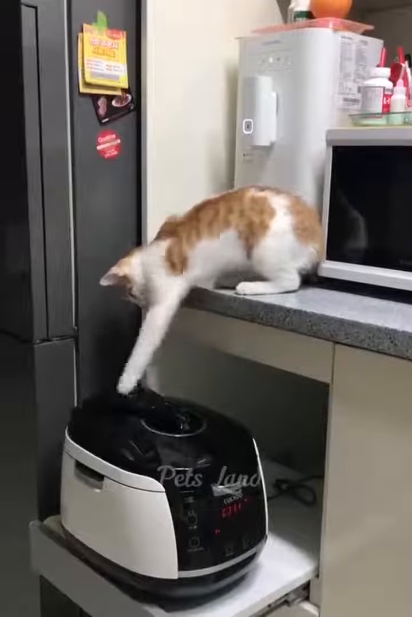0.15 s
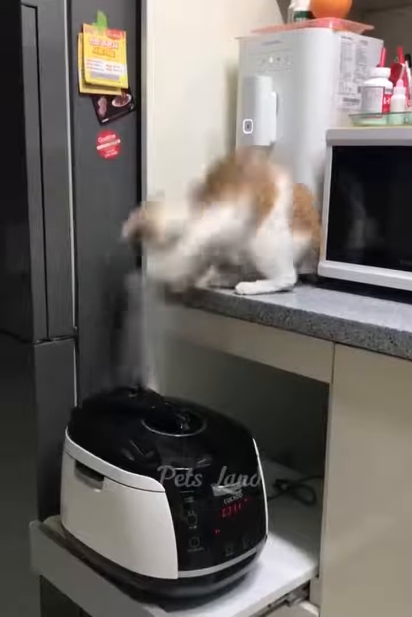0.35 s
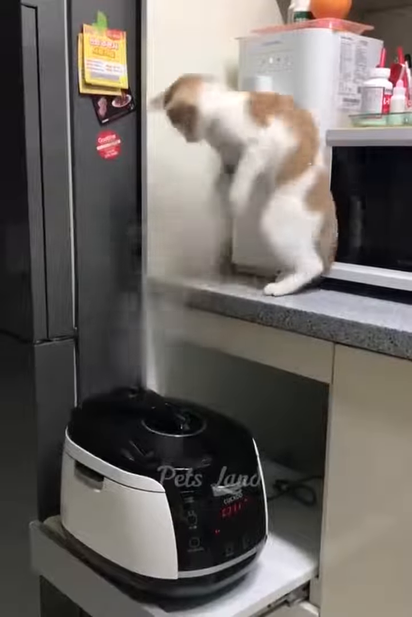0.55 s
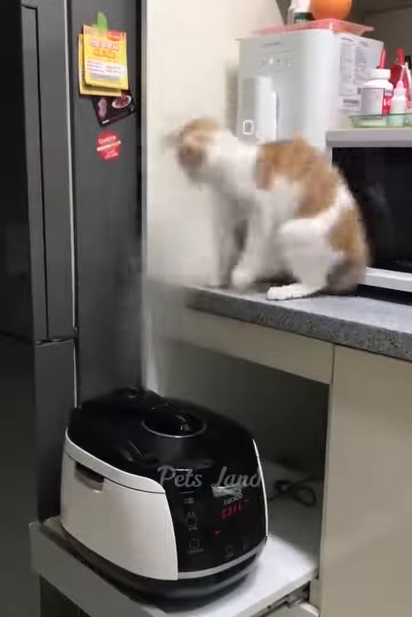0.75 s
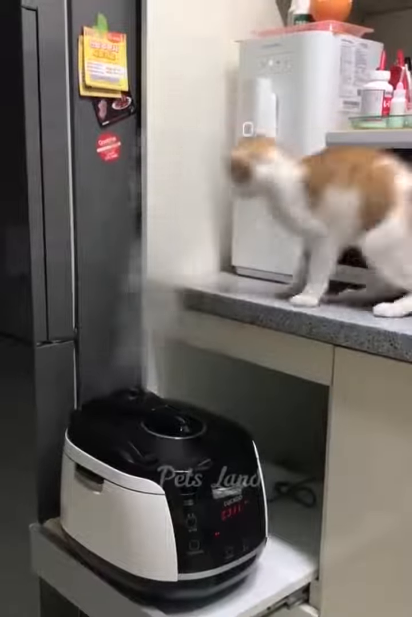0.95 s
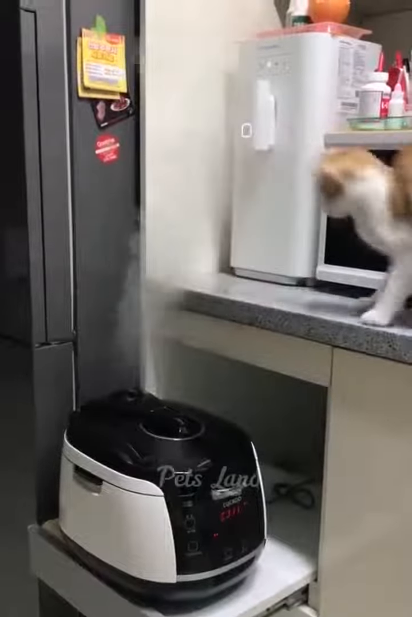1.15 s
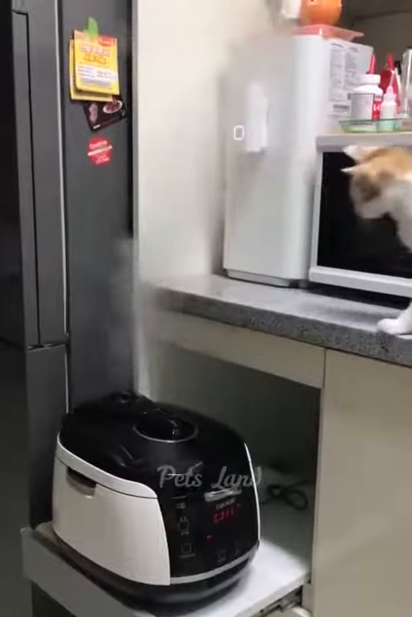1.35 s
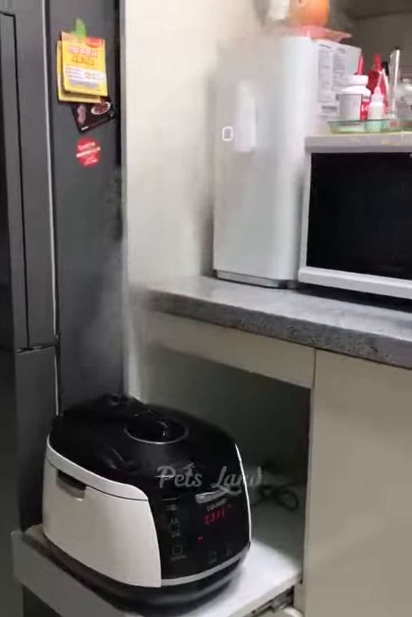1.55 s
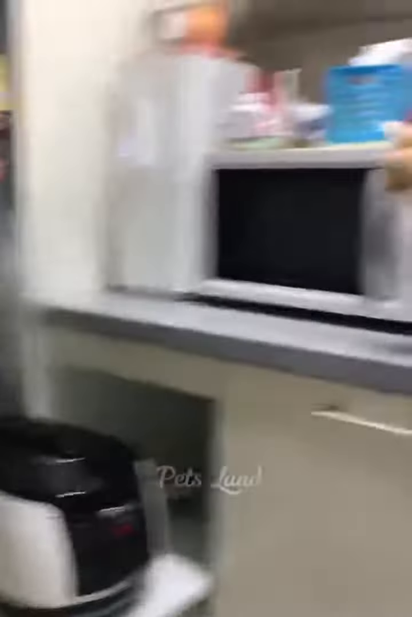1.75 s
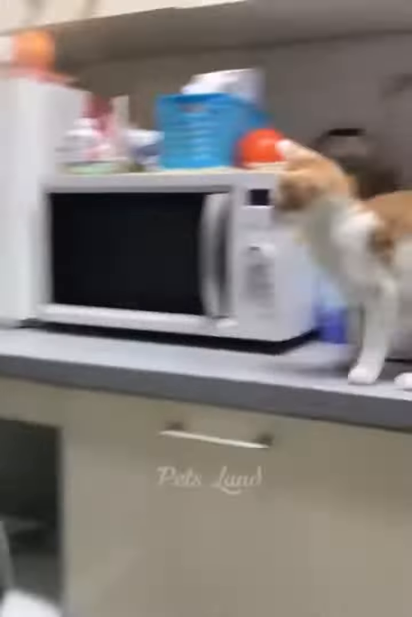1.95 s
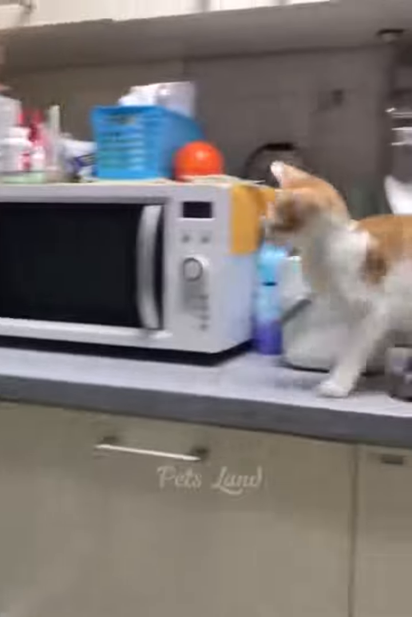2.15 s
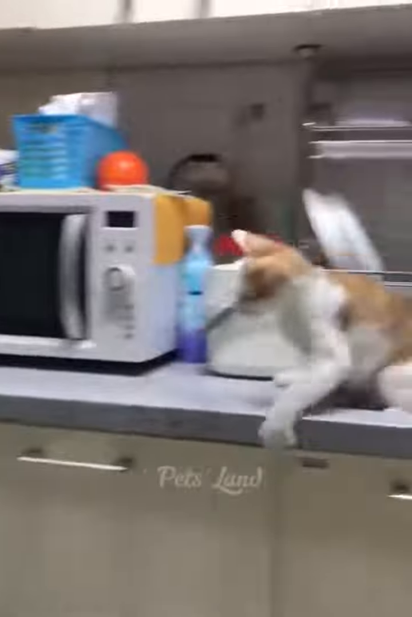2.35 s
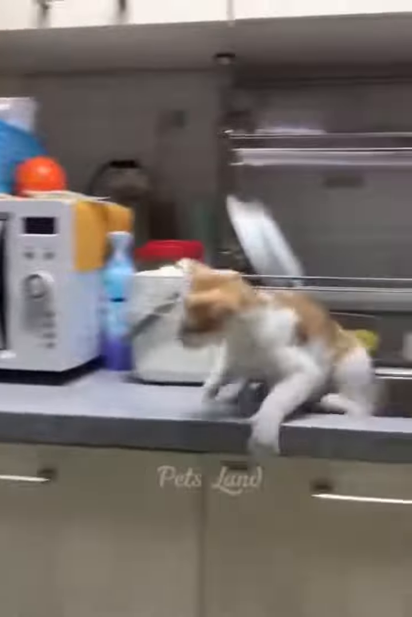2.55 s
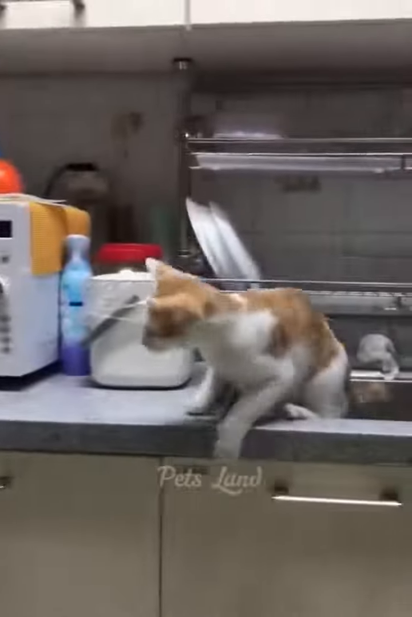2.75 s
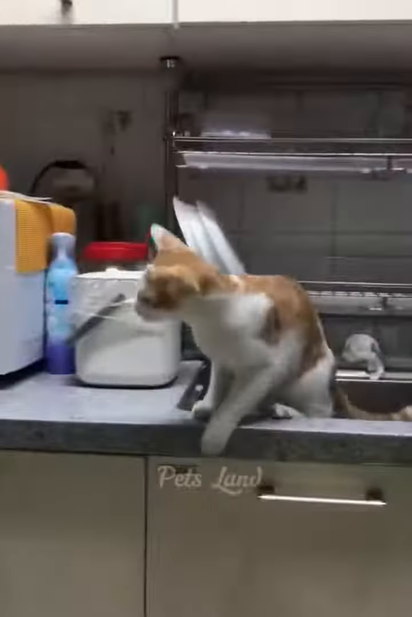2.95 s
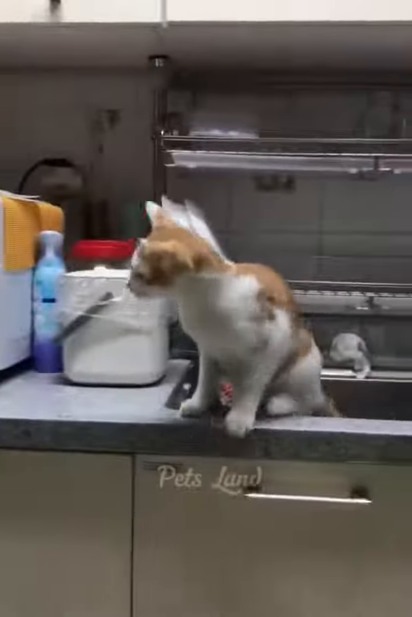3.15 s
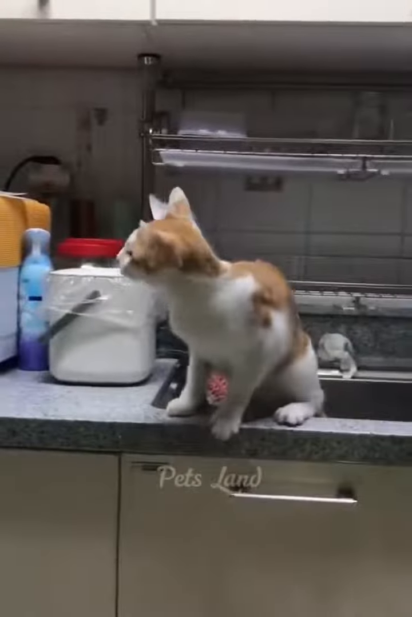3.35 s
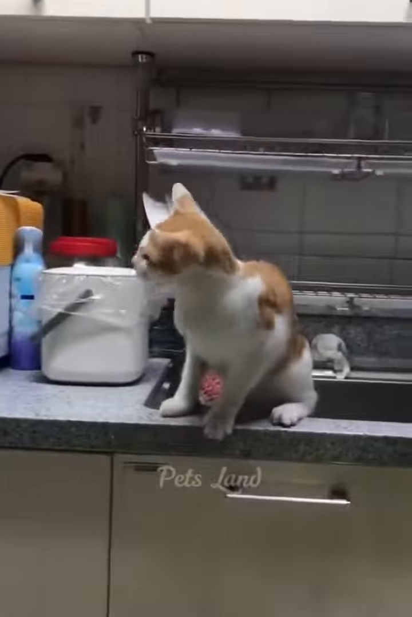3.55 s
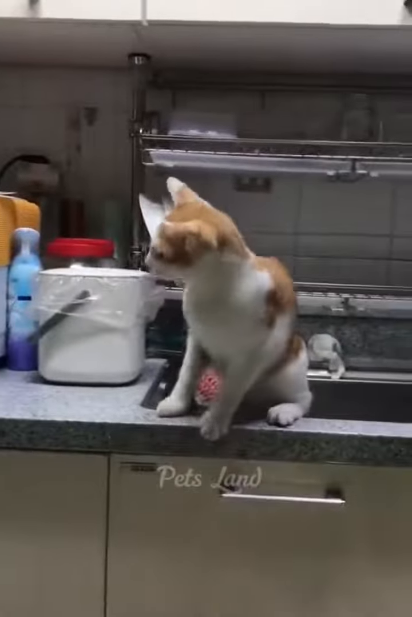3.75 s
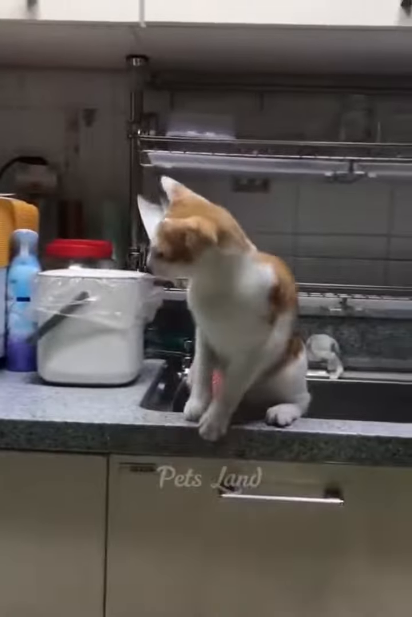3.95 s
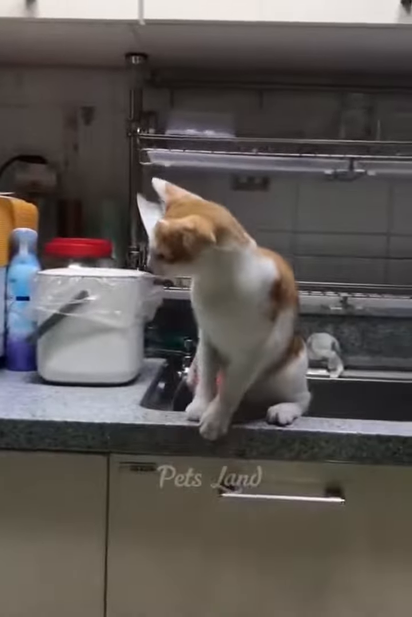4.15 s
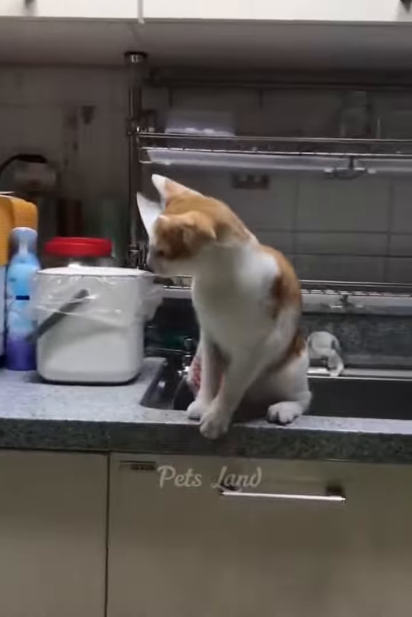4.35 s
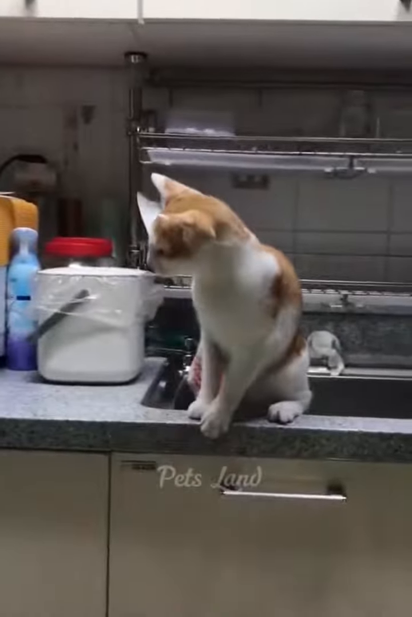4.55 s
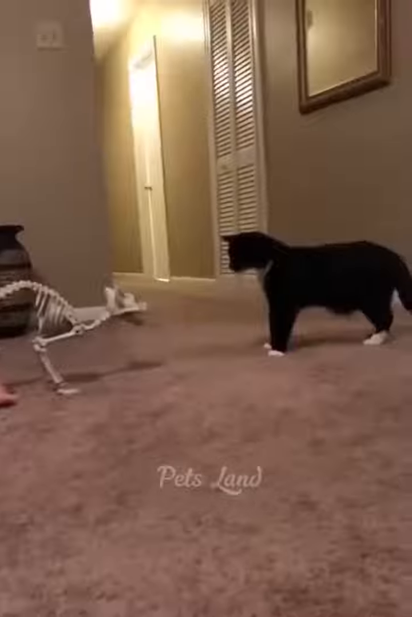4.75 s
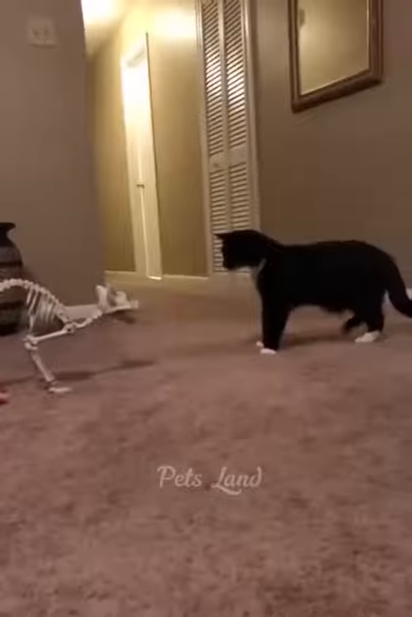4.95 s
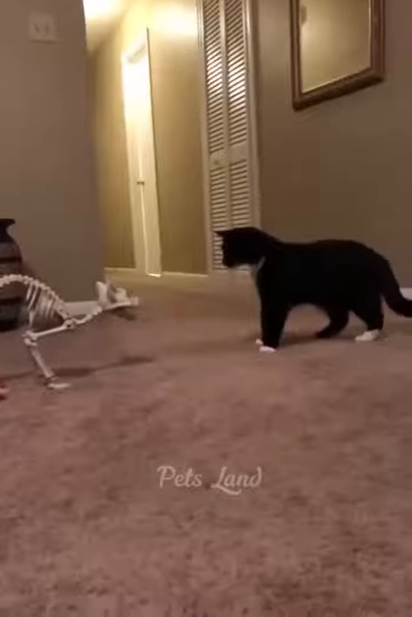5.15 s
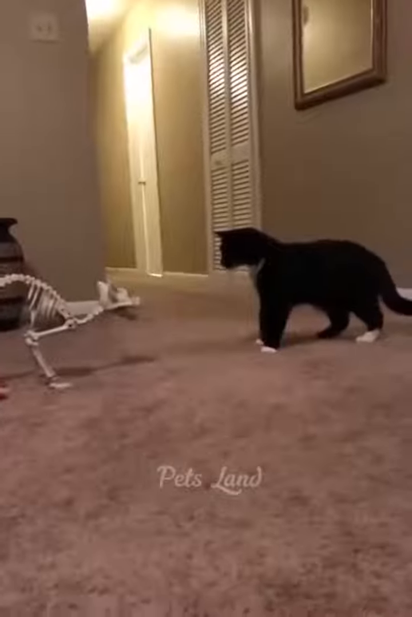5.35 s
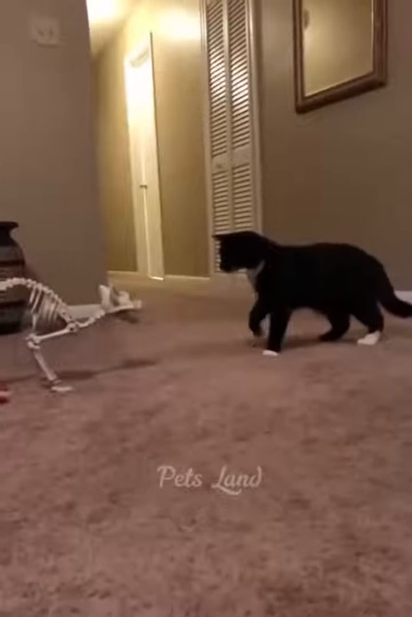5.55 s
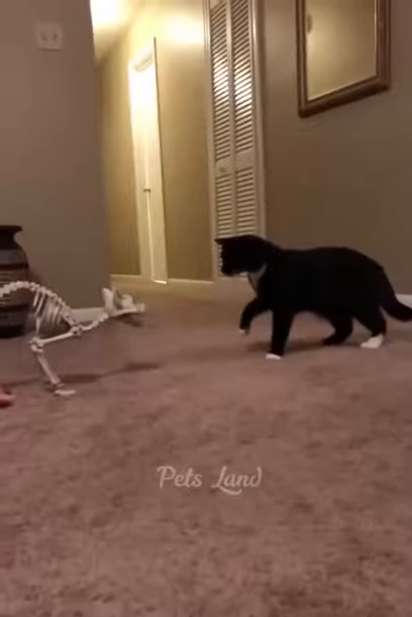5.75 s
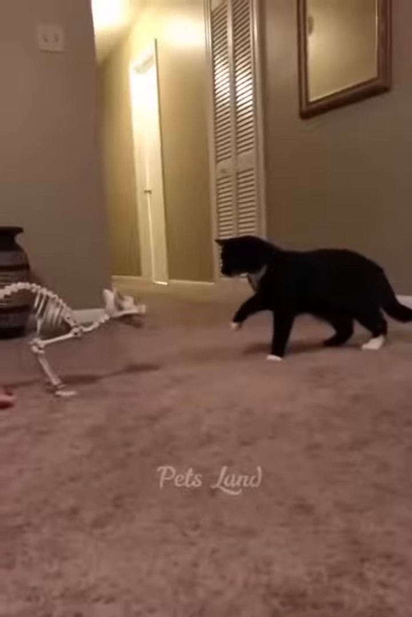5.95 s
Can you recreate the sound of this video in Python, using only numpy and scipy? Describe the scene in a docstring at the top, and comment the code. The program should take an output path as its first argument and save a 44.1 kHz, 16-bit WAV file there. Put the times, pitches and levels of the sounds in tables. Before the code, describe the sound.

The first quarter second is quiet kitchen air with a faint low rumble. At about 0.25 a small airy puff and weak wet spurt escape the cooker valve, and at 0.39 a tiny metallic tick sounds. At 0.41 the valve opens abruptly: a brief, strong watery spurt and roar settle within a few tenths into a loud, bright, dense steam hiss, fluttering finely, with narrow ringing tones and faint hollow echoes. Half-whistles swell subtly near 1.15 and more weakly near 3.4. Soft hollow paw thuds run underneath from 0.7 to 1.5 and again around 2.2 to 3.1, with short scuffs near 1.0, 1.3, 2.5 and 4.0, mostly masked. The hiss sags slightly, then stops dead at 4.75. After roughly 0.07 of silence, a carpeted room begins at 4.82: soft deep ventilation rumble, dull air noise and a low motor hum wavering in pitch and level until the end.

```python
"""In a kitchen, a cat paws the valve of a pressure rice cooker: a short puff, a tick, then a loud steam jet.
The puff, wet spurts and jet are coloured noise; the jet has cap resonances, half-whistles and echoes.
The cat's paws thud on a hollow counter (ringing noise bands) and scuff across it (short noise bursts).
Everything stops dead; after a blink of silence comes a carpeted lounge: low ventilation noise,
and a motor hum made by a sine wave of wavering pitch and level."""
import sys
import numpy as np
from scipy import signal
from scipy.fft import rfft, irfft, next_fast_len
from scipy.io import wavfile

SR = 44100
rng = np.random.default_rng(int(sys.argv[2]) if len(sys.argv) > 2 else 0)


def inscribe(sig):
    """Save sig as 16-bit PCM at rate SR to the path in sys.argv[1].

    A 1-D sig is mono; a 2-D sig holds one channel per row.
    Samples are clipped to [-1, 1] before scaling.
    """
    pcm = np.round(np.clip(np.atleast_2d(sig).T, -1, 1) * 32767)
    wavfile.write(sys.argv[1], SR, pcm.astype(np.int16))


N = 265041  # samples, about 6 s

VALVE_OPEN_S, VALVE_RISE_S = .4145, .016
KITCHEN_END_S, LOUNGE_START_S, LOUNGE_FADE_S = 4.7463, 4.8175, .003


def undb(db):
    """Turn decibels into a gain."""
    return 10 ** (np.asarray(db) / 20)


def clock():
    """Time of each sample in seconds."""
    return np.arange(N) / SR


def unit(x):
    """Scale a sound to rms 1."""
    return x / np.sqrt(np.mean(x ** 2))


def bins():
    """Frequency of each spectral bin in Hz, kept at 1 or more."""
    size = next_fast_len(N)
    return np.maximum(np.arange(size // 2 + 1) * SR / size, 1)


def colour(points):
    """Gain per bin, drawn through (frequency [Hz], level [dB]) points on a log frequency scale."""
    hz, db = np.transpose(points)
    return undb(np.interp(np.log(bins()), np.log(hz), db))


def resonance(hz, width_hz):
    """Gain per bin of one resonance, 1 at its centre."""
    return 1 / np.hypot(1, (bins() ** 2 - hz ** 2) / (bins() * width_hz))


def noise(gain):
    """Random noise shaped by a gain per bin, then scaled to rms 1."""
    size = next_fast_len(N)
    spectrum = rfft(rng.standard_normal(size)) * gain
    return unit(irfft(spectrum, size)[:N])


def walk(rate):
    """Random wander with a spread near 1: straight lines between `rate` random points per second."""
    steps = rng.standard_normal(2048)
    return 1.2 * np.interp(clock() * rate, np.arange(len(steps)), steps)


def burst(start, rise, decay):
    """Envelope that rises in a straight line, then dies away exponentially; times in seconds."""
    age = clock() - start
    return np.clip(age / rise, 0, 1) * np.exp(-np.maximum(age - rise, 0) / decay)


def swell(start, rise):
    """Rounded envelope of a soft blow: peaks at 1, one rise time after its start."""
    age = np.maximum(clock() - start, 0) / rise
    return age * np.exp(1 - age)


def surfaces(x, echo_db, drift_s, count=8):
    """Echoes off fridge, wall and counter, with slowly drifting delays, make the hiss faintly hollow."""
    out = x
    for lag_s in rng.uniform(.003, .022, count):
        path_s = lag_s + drift_s * walk(.8)
        source = np.round((clock() - path_s) * SR).astype(int)
        out = out + undb(echo_db) * x[np.clip(source, 0, N - 1)]
    return unit(out) * np.std(x)  # echoes leave the overall level as it was


# colour of the kitchen air: (frequency [Hz], relative level [dB])
KITCHEN_COLOUR = [(25, -32), (60, -23), (150, 1.5), (240, -5), (350, 3.5), (480, -13), (1000, -9.5),
                  (2000, -19.5), (6000, -21.5), (7200, -37), (15000, -34)]


def kitchen_air(air_db=-49, rumble_db=-56):
    """Steady quiet room noise, with a faint low rumble of wandering level."""
    rumble = noise(resonance(85, 90) ** 2) * undb(rumble_db + 2 * walk(6))
    return undb(air_db) * noise(colour(KITCHEN_COLOUR)) + rumble


# wet spurts from the valve: (time [s], level [dB], rise [s], decay [s])
SPURTS = [(0.269, -36, 0.0037, 0.07), (.427, -13.5, 0.02, 0.012), (0.459, -26, 0.012, 0.1)]
# colour of the spurting water: (frequency [Hz], relative level [dB])
SPURT_COLOUR = [(35, -31), (120, -14), (450, -8), (750, -7.5), (1150, -2.5), (1700, -10), (3000, -22),
                (7000, -35), (15000, -46.5)]


def valve():
    """A nudge lets out one puff; the weight ticks, tips over, and condensed water is blown out."""
    puff_colour = [(500, -42), (1800, -4), (3400, -3.0), (6000, -7), (7200, -26), (15000, -24)]
    puff = undb(-35) * noise(colour(puff_colour)) * burst(0.253, 0.02, 0.034)

    low_mode = resonance(2800, 700) ** 2
    middle_mode = undb(-10) * resonance(3300, 600) ** 2
    high_mode = undb(-10) * resonance(7200, 900)
    metal = noise(low_mode + middle_mode + high_mode)
    # a sharp click with a weaker, longer tail
    strike = burst(.387, .001, .0025) + undb(-13) * burst(.388, .002, .018)
    tick = undb(-32.5) * metal * strike

    spurts = sum(undb(db) * burst(s, rise, decay) for s, db, rise, decay in SPURTS)
    return puff + tick + noise(colour(SPURT_COLOUR)) * spurts


# broad colour of the steam: (frequency [Hz], relative level [dB])
STEAM_COLOUR = [(150, -27), (600, -25.5), (1150, -22), (1900, -10), (2650, -1.5), (3500, -2), (4450, -8.5),
                (4750, -4.5), (5200, -5.5), (6350, 2.5), (8000, -5.5), (10300, -7), (13500, -8),
                (15600, -4.5)]
# resonances of the vent cap and the nook round it: (frequency [Hz], width [Hz], relative level [dB])
VENT_RESONANCES = [(625, 35, 3), (1125, 30, 3), (1375, 25, 3), (1891, 27, 1), (2534, 22, 1), (2891, 18, 2),
                   (3079, 25, -4), (3158, 25, 5), (3296, 22, -1), (3348, 16, 1), (3440, 16, -4),
                   (3531, 18, 1), (3611, 22, 2.5), (3781, 22, -2), (4012, 16, 0), (6886, 22, 1),
                   (7884, 35, -2), (8670, 27, -1)]
# dips where paths round the cap cancel, and one slight bump: (frequency [Hz], width [Hz], change [dB])
STEAM_GAPS = [(2422, 210, -8.5), (4540, 350, 1), (6746, 380, -11.5), (10300, 700, -4)]
JET_DB = -17  # gain of the whole jet
SAG_DB_PER_S, CAP_SAG_DB_PER_S = .3345, .48  # hiss and cap sag with the pressure; the cap's extra sag
TOP_DB, ROAR_DB, CAP_DB = -2.5, -13, -5  # levels beside the hiss, before sag and surge
SURGE_ROAR_DB, SURGE_S = 9.5, .1  # extra roar at first, and its settling time


def steam_jet(flutter_db=0.58, sputter_db=0.58, ring_flutter_db=0.66, roar_edge_hz=2300,
              top_edge_hz=9500):
    """Jet noise rings the cap; both sag with pressure, the roar surges at first, and all flutter together."""
    age = np.maximum(clock() - VALVE_OPEN_S, 0)
    surge = np.exp(-age / SURGE_S)
    sag_db = -SAG_DB_PER_S * age
    gaps_db = sum(db * resonance(hz, width) ** 2 for hz, width, db in STEAM_GAPS)
    shape = colour(STEAM_COLOUR) * undb(gaps_db)

    # split the noise power into a low, a middle and a high band
    roar_share = 1 / (1 + (bins() / roar_edge_hz) ** 16)
    top_share = 1 / (1 + (top_edge_hz / bins()) ** 24)
    hiss_share = np.clip(1 - roar_share - top_share, 0, 1)
    ring = np.sqrt(sum((undb(db) * resonance(hz, width)) ** 2 for hz, width, db in VENT_RESONANCES))

    hiss = noise(shape * np.sqrt(hiss_share)) * undb(sag_db)
    cap_db = CAP_DB + sag_db - CAP_SAG_DB_PER_S * age + ring_flutter_db * walk(12)
    cap = noise(shape * ring) * undb(cap_db)
    roar = noise(shape * np.sqrt(roar_share)) * undb(ROAR_DB + SURGE_ROAR_DB * surge)
    top = noise(shape * np.sqrt(top_share)) * undb(TOP_DB)

    jet = surfaces(hiss + cap + top, echo_db=-15.5, drift_s=.00004)
    jet = jet + surfaces(roar, echo_db=-11.0, drift_s=.00006)
    opening = np.clip(age / VALVE_RISE_S, 0, 1)
    return jet * opening * undb(JET_DB + flutter_db * walk(28.06) + sputter_db * walk(220))


# half-whistled notes of the vent: (time of peak [s], pitch [Hz], peak level [dB])
WHISTLES = [(1.15, 2891, -27.5), (3.4, 3165, -33)]


def whistle(width_hz=45, fade_db_per_s=4.0):
    """The vent half whistles: narrow noise bands rise out of the hiss and sink back into it."""
    notes = 0
    for s, hz, db in WHISTLES:
        level_db = db - fade_db_per_s * np.abs(clock() - s)
        notes = notes + noise(resonance(hz, width_hz) ** 2) * undb(level_db)
    return notes * (clock() > VALVE_OPEN_S + VALVE_RISE_S)


# resonances of the hollow counter: (frequency [Hz], width before squaring [Hz], level before tilt [dB])
COUNTER = [(74, 21, -1.5), (122, 75, 0.5), (226, 160, -1)]
# paws landing; a harder landing tilts the thud upwards: (time [s], level [dB], tilt [dB per octave])
PAWS = [(.678, -32, 1), (.735, -37.5, 14), (.785, -32, 2.5), (.93, -39, 3), (1.03, -37, -6),
        (1.135, -33.5, -3.5), (1.21, -35.5, -7.5), (1.305, -28.5, -1.5), (1.42, -34, -5), (1.495, -33, -14),
        (2.228, -41, 15), (2.42, -37.5, 10), (2.478, -30.5, 13), (2.57, -37, 2), (2.615, -38, -11),
        (3.08, -43, 12)]
# paws scuffing and slipping: (time [s], level [dB])
SCUFFS = [(1.0, -28.5), (1.31, -34), (2.475, -28), (2.56, -35), (3.97, -30)]
# colour of the scuffs: (frequency [Hz], relative level [dB])
SCUFF_COLOUR = [(80, -17), (220, -10), (450, -10.5), (1100, -1.5), (2000, -1.5), (6000, -40)]
PAW_RISE_S, SCUFF_RISE_S, SCUFF_DECAY_S = .024, .0091, .056


def cat():
    """Soft paws thud on the hollow counter and scuff across its top."""
    hz, width, mode_db = np.transpose(COUNTER)
    rings = np.array([noise(resonance(f, w) ** 2) for f, w in zip(hz, width)])
    thuds = 0
    for s, db, tilt in PAWS:
        weights = undb(mode_db + tilt * np.log2(hz))
        thud = (weights @ rings) / np.linalg.norm(weights)  # tilt changes the tone, not the level
        thuds = thuds + undb(db) * swell(s, PAW_RISE_S) * thud
    strokes = sum(undb(db) * burst(s, SCUFF_RISE_S, SCUFF_DECAY_S) for s, db in SCUFFS)
    return thuds + noise(colour(SCUFF_COLOUR)) * strokes


# colour of the lounge air: (frequency [Hz], relative level [dB])
LOUNGE_COLOUR = [(20, -25), (30, -1), (42, -15), (60, -3), (90, -3), (125, -5), (155, -7.5), (210, -12),
                 (270, -13.5), (320, -22), (750, -23.5), (1300, -29.5), (5500, -41), (13000, -57)]


def lounge(rumble_db=-26, surge_db=0.7, boom_db=-27.5, air_db=-37.5, hum_hz=117.5, hum_db=-27.5,
           waver_db=2.5, waver_hz=2.78):
    """Ventilation rumbles in small random surges under steady boom and air noise; a motor hums unsteadily."""
    shape = colour(LOUNGE_COLOUR) * (bins() < 13100)
    # power shares: deep is below about 110 Hz, low is below about 400 Hz
    deep = 1 / (1 + (bins() / 110) ** 8)
    low = 1 / (1 + (bins() / 400) ** 8)
    rumble = noise(shape * np.sqrt(deep)) * undb(rumble_db + surge_db * walk(12))
    boom = noise(shape * np.sqrt(low * (1 - deep))) * undb(boom_db)
    air = noise(shape * np.sqrt(1 - low)) * undb(air_db)

    phase = 2 * np.pi * np.cumsum(hum_hz + waver_hz * walk(11)) / SR
    hum = np.sqrt(2) * np.sin(phase) * undb(hum_db + waver_db * walk(16))
    return rumble + boom + air + hum


def scene():
    """The kitchen, a blink of silence, then the lounge; both channels are the same."""
    kitchen = kitchen_air() + valve() + steam_jet() + whistle() + cat()
    lounge_fade = np.clip((clock() - LOUNGE_START_S) / LOUNGE_FADE_S, 0, 1)
    mono = kitchen * (clock() < KITCHEN_END_S) + lounge() * lounge_fade
    return np.array([mono, mono])


def record(dry):
    """A steep low-pass filter cuts the treble above 15650 Hz."""
    low_pass = signal.ellip(12, .1, 90, 15650, fs=SR, output="sos")
    return signal.sosfilt(low_pass, dry)


dry = scene()
out = record(dry)
inscribe(out)
```